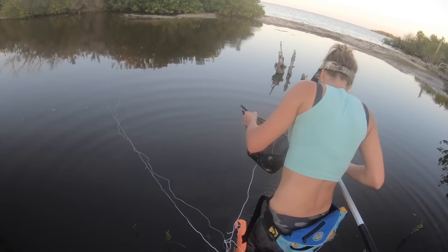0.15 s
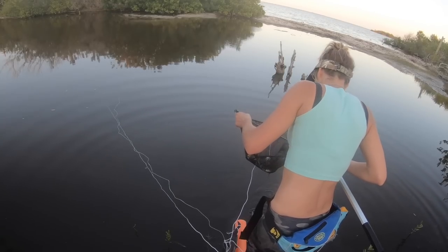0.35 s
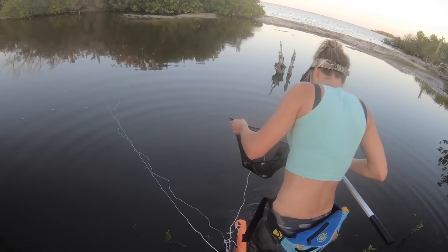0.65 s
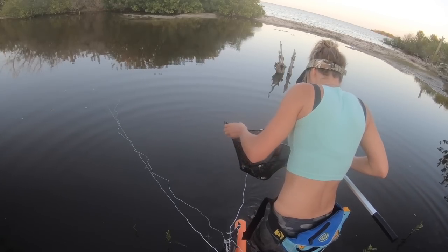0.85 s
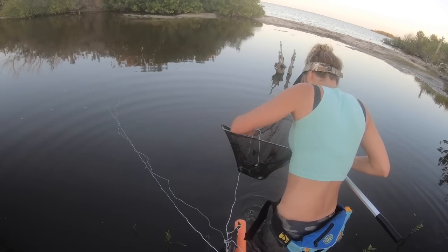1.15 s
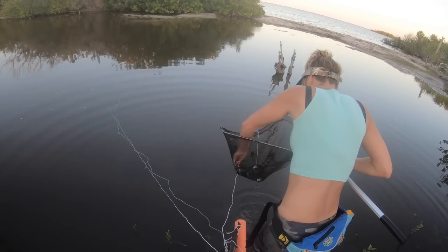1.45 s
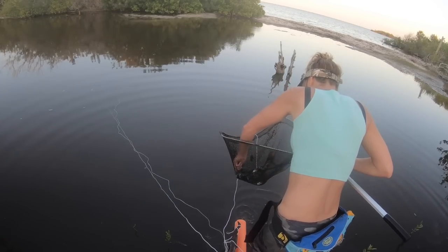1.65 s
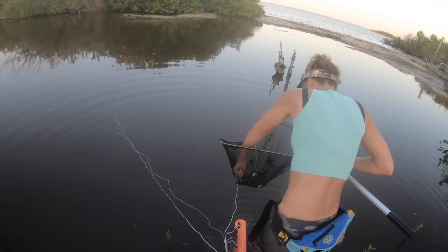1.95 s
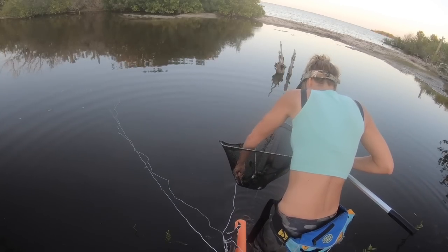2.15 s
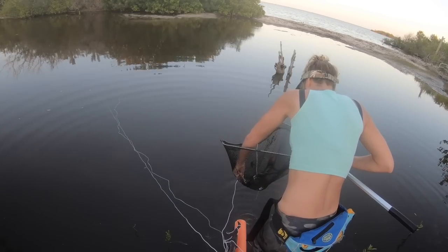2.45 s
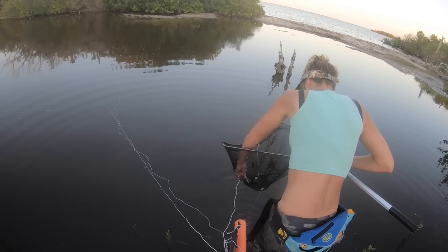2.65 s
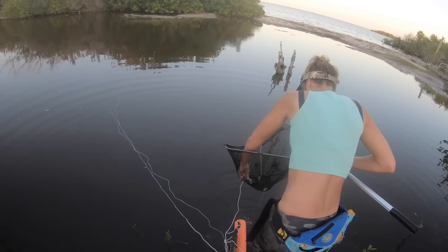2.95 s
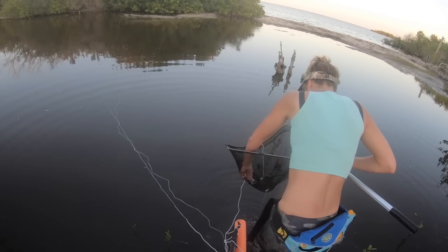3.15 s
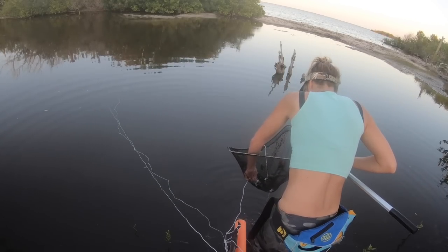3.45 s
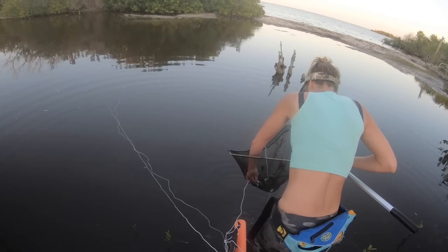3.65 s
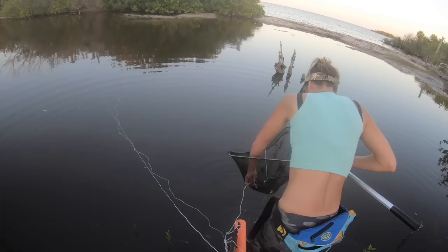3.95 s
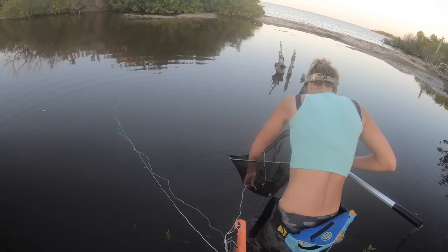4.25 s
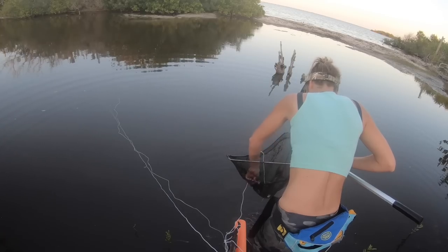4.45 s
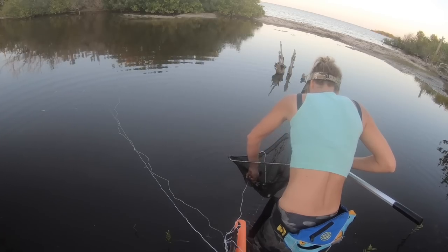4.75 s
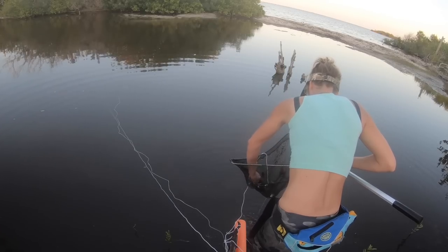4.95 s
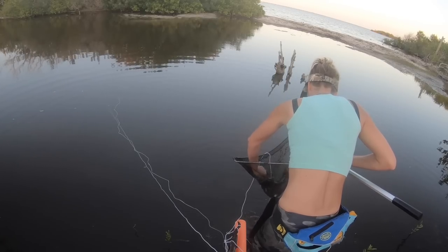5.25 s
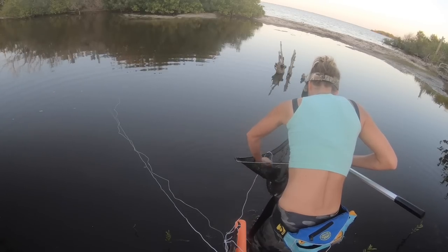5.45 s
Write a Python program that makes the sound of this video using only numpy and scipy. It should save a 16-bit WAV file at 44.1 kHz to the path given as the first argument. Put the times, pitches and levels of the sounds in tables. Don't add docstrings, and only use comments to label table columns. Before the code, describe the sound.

Water drips and trickles off a wet net into calm water, with bubbly plops, bright plinks and a light breeze bumping the microphone.

```python
import sys
import numpy as np
from scipy import signal
from scipy.fft import rfft, irfft
from scipy.io import wavfile
from scipy.ndimage import uniform_filter1d

SR = 44100
rng = np.random.default_rng(int(sys.argv[2]) if len(sys.argv) > 2 else 0)


def to_linear_factor(level_db):
    exponent = np.asarray(level_db, float) / 20
    return 10 ** exponent


def store_pcm(level_fs):
    pcm = np.round(np.clip(level_fs, -1, 1) * 32767).astype(np.int16)
    wavfile.write(sys.argv[1], SR, np.atleast_2d(pcm).T)


N = 247386

# frequency in Hz, density in dB per Hz.
SHORE_SPECTRUM = [(210, -28.5), (350, -4.5), (533, -11), (823, -1.5), (947, -8.5), (1990, -11.5),
                  (2290, -13), (3030, -17.5), (3690, -23.5), (5160, -25), (6930, -26), (9980, -34.5),
                  (13000, -59), (22000, -120)]
SHORE_DB = -68

# frequency in Hz, density in dB per Hz.
RUMBLE_SPECTRUM = [(8.8, -30), (15, -2), (43, 3.5), (86, 3.5), (204, -21), (400, -46.5), (520, -63),
                   (880, -120)]
# frequency in Hz, density in dB per Hz.
FLUTTER_SPECTRUM = [(90, -18), (130, 1), (180, -1.5), (240, -10), (330, -22), (500, -47)]
# peak time in seconds, peak level in dB, half width in seconds.
GUSTS = [(0.086, -40.5, 0.018), (.25, -51, 0.067), (0.346, -32.5, 0.042), (0.582, -35, 0.031),
         (0.759, -38.5, 0.028), (.88, -36, 0.032), (1.2, -45.5, 0.058), (1.52, -49, 0.11),
         (2.12, -60.5, 0.055), (2.5, -53.5, 0.11), (2.679, -44.5, 0.048), (3.1, -59.5, .08),
         (3.27, -51, 0.068), (3.7, -61.5, 0.15), (4.09, -55.5, 0.035), (4.31, -53, 0.078),
         (4.64, -57.5, 0.036), (4.861, -48.5, 0.028), (5.109, -51, 0.054), (5.32, -55, 0.06),
         (5.6, -56.5, .06)]
# time in seconds, level in dB.
LULL = [(0, -46.5), (1.0, -45), (1.4, -55), (2.2, -59.5), (3.4, -63), (5.61, -64)]
# time in seconds, left minus right in dB.
BREEZE_BALANCE = [(0.0, -3.5), (1.51, 1), (1.78, -1), (5.61, 0)]
FLUTTER_DB, FLUTTER_KNEE_DB, FLUTTER_STEEPNESS = -55, -42.5, 1.64

# peak time in seconds, trickle level in dB, spray relative to it in dB, decay in
# seconds.
SURGES = [(.24, -60.5, -10, 0.29), (.57, -72.5, -5, 0.15), (.95, -71.5, -7, 0.23), (1.15, -66, -11.5, 0.23),
          (1.62, -63, -14.5, 0.36), (2.0, -85.5, -1, 0.45), (2.43, -68, -18, 0.073), (2.8, -67, -19, 0.056),
          (3.07, -63.5, -14.5, 0.066), (3.34, -69, -13.5, 0.31), (3.701, -66, -12, 0.024),
          (3.88, -85, 7.5, 0.063), (4.09, -64.5, -25, 0.076), (4.99, -65, -13.5, 0.053),
          (5.4, -71, -15.5, .4)]
SURGE_RISE_S, SEEP_DB, SEEP_SPRAY_DB = 0.037, -82.5, -91.5

# start in seconds, life in ms, birth pitch in Hz, end pitch in Hz, level in dB.
CLIMBERS = [(0.084, 12.5, 704, 1110, -43.5), (0.106, 52, 1160, 2490, -50), (0.23, 13.4, 630, 1560, -42.5),
            (.53, 24, 1130, 2170, -49), (.574, 22, 1650, 2740, -52), (.626, 27, 438, 3010, -44),
            (.816, 47, 666, 1050, -49), (.92, 58, 872, 1510, -54.5), (.971, 46, 534, 740, -45.5),
            (1.019, 57, 508, 604, -51), (1.177, 35, 884, 2600, -56), (1.413, 25.5, 669, 2800, -49.5),
            (1.773, 27.6, 621, 2430, -48), (2.29, 60, 713, 1200, -61.5), (2.73, 18, 657, 1060, -57),
            (2.752, 19.5, 550, 1180, -52.5), (3.029, 36, 986, 2860, -53.5), (3.362, 26.4, 1050, 3620, -42),
            (3.476, 28, 1025, 1300, -61), (4.058, 19.3, 1144, 2890, -51.5), (4.114, 4.9, 1180, 1900, -54),
            (4.31, 18, 1194, 2420, -65), (5.46, 23.6, 1202, 2550, -50), (5.58, 70, 703, 830, -53.5)]
CLIMB_POWER, LINGER_MS = 1.4, 48
# start in seconds, life in ms, birth pitch in Hz, swung pitch in Hz, level in dB.
SWINGERS = [(.256, 41, 583, 525, -53), (0.378, 37, 1140, 1065, -46), (1.13, 58, 2410, 2270, -62),
            (1.153, 21, 714, 997, -41), (1.229, 29, 584, 880, -44.5), (1.264, 21, 1440, 1200, -42.5),
            (1.3, 59, 1990, 1620, -56.5), (1.468, 21, 1570, 1380, -50), (1.574, 16, 1480, 1380, -53),
            (1.617, 11, 1490, 1315, -51), (1.715, 14.4, 1650, 1270, -40.5), (1.769, 6.1, 1510, 1380, -36),
            (2.043, 6.2, 1470, 1310, -51.5), (2.8, 20, 1430, 1613, -58), (3.082, 50, 1635, 1550, -55.5),
            (3.087, 33, 865, 1080, -55.5), (3.248, 15.6, 656, 1123, -40.5), (3.685, 35, 1073, 972, -40.5),
            (4.461, 7.6, 1710, 1430, -51)]
REBOUND_SHARE = 0.22
# start in seconds, life in ms, pitch in Hz, level in dB.
RINGERS = [(.168, 16, 2520, -59), (.319, 6.1, 1270, -49.5), (.325, 37, 743, -57), (.441, 7.6, 1000, -49),
           (.484, 20, 1750, -57.5), (1.262, 31, 850, -51.5), (1.896, 48, 1046, -64),
           (2.077, 48, 737, -52.5), (3.951, 41, 818, -48), (4.691, 18, 1138, -50), (5.179, 10, 1170, -53),
           (5.34, 15, 1630, -52), (5.492, 105, 771, -60.5)]
SURFACING_OCTAVES = 0.072

# time in seconds, peak in dB, pitch in Hz.
BEADS = [(0.1572, -55, 5400), (0.317, -42, 7140), (.387, -39, 7200), (0.5216, -50.5, 5700),
         (0.8675, -48, 5400), (1.5389, -44, 8800), (1.604, -51, 5900), (1.7031, -45.5, 8650),
         (1.8154, -60, 5300), (2.2034, -55, 6300), (2.6714, -44.5, 8200), (2.814, -51.5, 6100),
         (2.9079, -41, 5170), (2.933, -49, 5340), (3.047, -43.5, 5500), (3.283, -51, 5450),
         (3.4585, -39.5, 5820), (3.5409, -48.5, 6060), (3.7958, -45.5, 6100), (4.4605, -47, 6170),
         (4.69, -46.5, 6400), (4.8005, -51.5, 5940), (4.9955, -51, 5540), (5.252, -50, 5360),
         (5.3849, -44.5, 6270), (5.4436, -43, 7840)]
# time in seconds, peak in dB, pitch in Hz.
DROPLETS = [(0.1842, -50, 4750), (0.5505, -38, 4100), (0.5875, -46, 4940), (0.818, -50, 5200),
            (0.9396, -42, 5000), (0.9737, -47.5, 4870), (1.0036, -52, 5100), (1.068, -42, 4940),
            (1.1268, -41, 4950), (1.3858, -49, 4280), (1.563, -55.5, 4470), (1.621, -46, 5000),
            (1.9911, -39, 4800), (2.0667, -50, 4730), (2.2589, -46.5, 4310), (2.4374, -49, 4180),
            (2.8878, -45.5, 5070), (3.0273, -43.5, 4480), (3.116, -50, 4690), (3.1976, -51.5, 5130),
            (3.3643, -50, 4530), (3.686, -56, 4600), (3.8576, -49, 4400), (3.937, -54.5, 4460),
            (4.672, -51, 5200), (5.1784, -48, 4450), (5.4959, -51, 4200)]
# time in seconds, peak in dB, pitch in Hz.
PLINKS = [(.187, -48.5, 2780), (.2339, -34.5, 3230), (.5522, -40, 3310), (.7345, -48.5, 3240),
          (.7678, -53, 2970), (.8345, -49.5, 3210), (.865, -54.5, 3240), (.9433, -53.5, 4200),
          (.9674, -41.5, 3470), (1.0402, -57, 3390), (1.0525, -43.5, 3140), (1.199, -53, 4170),
          (1.7693, -55, 3070), (2.2569, -47.5, 4100), (2.9078, -48, 4200), (3.3832, -60, 2770),
          (3.4583, -55, 3430), (3.697, -43.5, 2960), (3.7347, -57, 3260), (3.8125, -55.5, 2970),
          (4.6783, -59, 4130), (4.693, -53, 3100), (4.996, -46, 3170)]
# time in seconds, peak in dB, pitch in Hz.
SMACKS = [(.3156, -36, 2700), (.397, -38.5, 3150), (.645, -40, 2340), (.8134, -52, 2920),
          (1.0041, -30, 4180), (1.4163, -41, 1820), (1.6202, -47.5, 2420), (2.2042, -39.5, 3250),
          (2.2328, -50.5, 3500), (2.401, -49, 2430), (2.438, -50, 2140), (3.3316, -32, 2300),
          (3.5078, -48.5, 3200), (3.6827, -48.5, 2340), (4.124, -49, 2400), (4.2344, -48.5, 3780),
          (4.462, -51.5, 2130), (4.9685, -49, 2770), (5.1802, -40.5, 2270)]
# time in seconds, peak in dB, pitch in Hz.
STRAYS = [
    (0.345, -42.5, 11500),
    (3.216, -54.5, 2380),
    (4.047, -55.5, 3550),
]
# time in seconds, peak in dB, pitch in Hz.
DRIPS = [(1.0705, -46, 2640), (1.1313, -54, 2420), (1.2466, -36, 2340), (1.3538, -55, 2360),
         (1.56, -56.5, 2540), (1.7943, -45.5, 1950), (1.8975, -56, 1930), (2.3451, -58, 2410),
         (2.685, -52, 2070), (2.766, -57.5, 2330), (2.825, -52, 2600), (2.8458, -52, 2310),
         (2.8725, -44, 2340), (3.03, -44.5, 2560), (3.1379, -52.5, 2300), (3.1773, -54.5, 2360),
         (3.5593, -53, 2200), (3.8595, -41.5, 2614), (5.2936, -50.5, 2450), (5.447, -56, 2220),
         (5.474, -54.5, 2200)]
SMACK_CYCLES, DRIP_CYCLES, PLINK_CYCLES = 2.33, 4.95, 5.8

# start in seconds, length in seconds, centre in Hz, level in dB.
GUSHES = [
    (2.658, 0.06, 8700, -65),
    (5.491, 0.094, 1500, -58.5),
    (5.494, 0.034, 3840, -53),
    (5.549, 0.082, 6040, -65.5),
]

# from in seconds, to in seconds, extra left level in dB.
LEFT_DRIPS = [
    (4.11, 4.135, 21),
    (4.95, 4.98, 21),
    (5.485, 5.53, 12.5),
]
# frequency in Hz, left minus right in dB.
PORT_BALANCE = [(500, -1.5), (2300, -5), (4500, -2.5), (6500, 3.7), (9000, -1.5), (12000, -6)]
# frequency in Hz, left lead in radians.
PORT_LEAD = [(4500, 0), (6200, -1.6), (8400, -2.4), (11000, -1.5)]
# frequency in Hz, gain in dB.
GRILLE = [(3000, 0), (7000, 0), (9500, 0), (11000, -13.5), (15000, -8.5)]
HOUSING_T60_S, HOUSING_DB = .035, -11


def unit(x):
    return x / np.sqrt(np.mean(x ** 2))


def on_log(points, hz):
    point_hz, value = np.transpose(points)
    return np.interp(np.log(np.maximum(hz, 1)), np.log(point_hz), value)


def curve(table):
    s, value = np.transpose(table)
    return np.interp(np.arange(N) / SR, s, value)


def walk(rate_hz):
    hold = int(SR / rate_hz)
    steps = np.repeat(rng.standard_normal(N // hold + 1), hold)
    slewed = uniform_filter1d(uniform_filter1d(steps, hold), hold)
    return unit(slewed[:N])


def bands(points, flicker_db, rate_hz, likeness):
    hz = np.arange(N // 2 + 1) * SR / N
    shape = to_linear_factor(on_log(points, hz))
    octave = np.log2(np.maximum(hz, 1))
    out = 0
    for centre in np.arange(np.log2(points[0][0]), np.log2(points[-1][0]) + .5, .5):
        share = np.cos(np.pi * np.clip(octave - centre, -.5, .5))
        mid, side = irfft(rfft(rng.standard_normal((2, N))) * shape * share, N)
        pair = np.sqrt(1 + likeness) * mid + np.sqrt(1 - likeness) * side * np.array([[1], [-1]])
        out = out + pair * to_linear_factor(flicker_db * walk(rate_hz))
    return unit(out)


def add(out, s, sound, pan_db):
    for port, sign in enumerate((1, -1)):
        i = int(s * SR - sign * pan_db * .3)
        n = max(min(len(sound), N - i), 0) * (i >= 0)
        out[port, i:i + n] += sound[:n] * to_linear_factor(sign * pan_db / 2)


def side_of(s):
    return sum(db for start, end, db in LEFT_DRIPS if start <= s < end)


def plink(hz, cycles, glide, tick_db):
    turn = np.arange(int(3 * cycles * SR / hz) + 8) * hz / SR
    ring = np.sin(2 * np.pi * (turn + glide * turn ** 2 / (2 * cycles)))
    sound = ring * (1 - np.exp(-turn / 0.22)) * np.exp(-(turn / cycles) ** 1.13 * 0.69)
    sound[:4] += to_linear_factor(tick_db) * np.array([-0.91, -0.5, -1.5, -0.13])
    return sound


def shore():
    wash = bands(SHORE_SPECTRUM, flicker_db=.9, rate_hz=5, likeness=.1) * to_linear_factor(.5 * walk(3))
    return wash * to_linear_factor(SHORE_DB + np.array([[-.6], [.6]]))


def gusts():
    t = np.arange(N) / SR
    power = to_linear_factor(curve(LULL)) ** 2
    for s, db, width_s in GUSTS:
        power = power + to_linear_factor(db) ** 2 * np.exp(-((t - s) / width_s) ** 2)
    rumble_db = 10 * np.log10(power)
    over_knee = to_linear_factor(FLUTTER_STEEPNESS * (rumble_db - FLUTTER_KNEE_DB)) ** 2
    return rumble_db, FLUTTER_DB + 10 * np.log10(1 + over_knee)


def breeze():
    rumble_db, flutter_db = gusts()
    pan_db = curve(BREEZE_BALANCE)
    rumble = to_linear_factor(rumble_db + 3.5) * bands(RUMBLE_SPECTRUM, flicker_db=1.7, rate_hz=7, likeness=0.48)
    flutter = to_linear_factor(flutter_db) * bands(FLUTTER_SPECTRUM, flicker_db=1.6, rate_hz=12, likeness=.1)
    eddies = to_linear_factor(2.23 * np.array([walk(20), walk(18)]))
    return (rumble + flutter) * eddies * to_linear_factor(np.array([pan_db, -pan_db]) / 2)


def drain():
    t = np.arange(N) / SR
    fine, trickle = to_linear_factor(SEEP_SPRAY_DB) ** 2, to_linear_factor(SEEP_DB) ** 2
    for s, db, spray_db, decay_s in SURGES:
        exponent = np.where(t < s, -((t - s) / SURGE_RISE_S) ** 2, -2 * (t - s) / decay_s)
        power = to_linear_factor(db) ** 2 * np.exp(exponent)
        fine = fine + power * to_linear_factor(spray_db) ** 2
        trickle = trickle + power
    return np.sqrt(fine), np.sqrt(trickle)


def patter(low_hz, octaves, cycles, scatter_db, tilt_db, count):
    out = np.zeros((2, N))
    for when, pitch, size, side in rng.random((count, 4)):
        db = scatter_db * min(-np.log(1 - size), 4) + tilt_db * octaves * pitch
        drop = plink(low_hz * 2 ** (octaves * pitch), cycles, glide=0.032, tick_db=-23)
        add(out, when * N / SR, to_linear_factor(db) * drop, 12 * (side - .5))
    return unit(out)


def spray():
    fine_gain, trickle_gain = drain()
    fine = patter(3200, octaves=2.1, cycles=3.2, scatter_db=3.6, tilt_db=-1.5, count=5000)
    trickle = patter(969, octaves=1.865, cycles=5.5, scatter_db=4.7, tilt_db=-0.49, count=1500)
    return fine * fine_gain * to_linear_factor(8.5) + trickle * trickle_gain * to_linear_factor(-0.5)


def trapped_air():
    for s, ms, *hz, db in CLIMBERS:
        birth, end = np.log2(hz)
        half_way = birth + (end - birth) * .5 ** (CLIMB_POWER + (ms / LINGER_MS) ** 4)
        yield s, ms, birth, half_way, end, db
    for s, ms, *hz, db in SWINGERS:
        birth, swung = np.log2(hz)
        yield s, ms, birth, swung, swung - REBOUND_SHARE * (swung - birth), db
    for s, ms, hz, db in RINGERS:
        birth = np.log2(hz)
        yield s, ms, birth, birth + SURFACING_OCTAVES / 2, birth + SURFACING_OCTAVES, db


def bubbles():
    out = np.zeros((2, N))
    for s, ms, birth, half_way, end, db in trapped_air():
        life = np.arange(int(1.8 * ms * SR / 1000)) / (ms * SR / 1000)
        bend = np.polyfit([0, .5, 1], [birth, half_way, end], deg=2)
        octave = np.polyval(bend, np.minimum(life, 1))
        rise = np.clip(end - birth, 0, 2)
        fade_db = -(11 + 13 * np.exp(-rise / .15)) * life ** .8
        fade_db -= 200 * min(rise, .5) * np.maximum(life - .95, 0)
        onset = np.minimum(life / (0.0088 + 3.6 * rise / ms), 1)
        sound = onset * to_linear_factor(fade_db) * np.sin(2 * np.pi * np.cumsum(2 ** octave) / SR)
        sound[:4] += to_linear_factor(-19) * np.array([1.5, -5.0, -1.5, -7.3])
        add(out, s, to_linear_factor(db + 2) * sound, side_of(s))
    return out


def splash(out, s, db, hz, cycles, chance, tick_db):
    glide = 0.033 * (chance[0] - .2)
    add(out, s, to_linear_factor(db) * plink(hz, cycles, glide, tick_db), side_of(s))
    for late, pitch, size in chance[1:].reshape(-1, 3):
        small_hz = min(hz * 2 ** (1.8 * pitch - .7), 14000)
        small = plink(small_hz, cycles=7.3, glide=0.019, tick_db=-18)
        crown_db = db - 14 - 10 * size - 6 * late
        add(out, s + 0.0018 + .022 * late ** 1.2, to_linear_factor(crown_db) * small, side_of(s) + 6 * (size - .5))


def drops():
    out = np.zeros((2, N))
    for table in BEADS, DROPLETS, STRAYS:
        for (s, db, hz), chance in zip(table, rng.random((30, 16))):
            splash(out, s, db + 6.5, hz, 0.61 + 4.4 * chance[1], chance, tick_db=-8)
    for table, cycles in (PLINKS, PLINK_CYCLES), (SMACKS, SMACK_CYCLES), (DRIPS, DRIP_CYCLES):
        for (s, db, hz), chance in zip(table, rng.random((30, 16))):
            splash(out, s, db + 4, hz, cycles, chance, tick_db=-11)
    return out


def gushes():
    out = np.zeros((2, N))
    for s, length_s, hz, db in GUSHES:
        u = np.arange(int(2 * length_s * SR)) / (length_s * SR)
        band = signal.butter(2, [0.51 * hz, 1.19 * hz], "band", fs=SR, output="sos")
        hiss = signal.sosfilt(band, rng.standard_normal(N))
        ragged = unit(hiss) * to_linear_factor(2.5 * walk(250))
        envelope = np.minimum(u / 0.09, 1) * np.exp(-1.5 * u ** 2)
        add(out, s, to_linear_factor(db) * ragged[:len(u)] * envelope, side_of(s))
    return out


def ports(water):
    t = np.arange(int(.09 * SR)) / SR
    ring = rng.standard_normal((2, len(t))) * np.exp(-np.log(1000) * t / HOUSING_T60_S) * (t > .0015)
    ring *= to_linear_factor(HOUSING_DB) / np.sqrt(np.sum(ring ** 2, axis=1, keepdims=True))
    bright = signal.sosfilt(signal.butter(2, 1500, "high", fs=SR, output="sos"), water)
    water = water + signal.fftconvolve(bright, ring, axes=1)[:, :N]
    hz = np.arange(N // 2 + 1) * SR / N
    left = to_linear_factor(on_log(PORT_BALANCE, hz) / 2) * np.exp(1j * on_log(PORT_LEAD, hz) / 2)
    return irfft(rfft(water) * to_linear_factor(on_log(GRILLE, hz)) * np.array([left, 1 / left]), N)


def scene():
    background = shore() + breeze()
    water = spray() + bubbles() + drops() + gushes()
    return background + ports(water)


def low_pass(x):
    return signal.sosfilt(signal.butter(12, 14850, fs=SR, output="sos"), x)


def record(dry):
    return low_pass(dry)


dry = scene()
out = record(dry)
store_pcm(out)
```